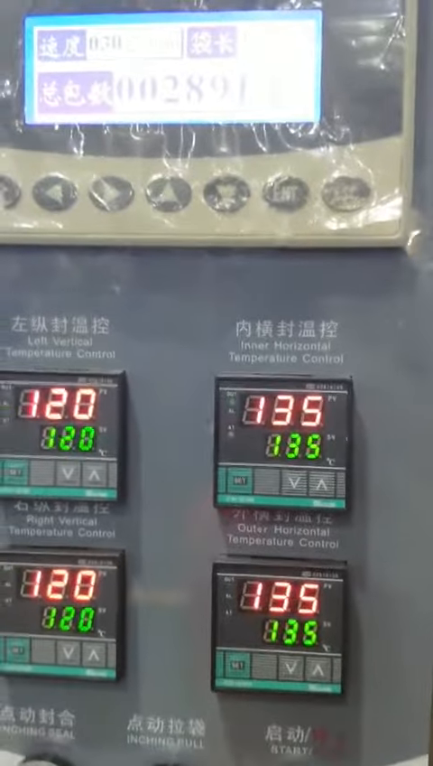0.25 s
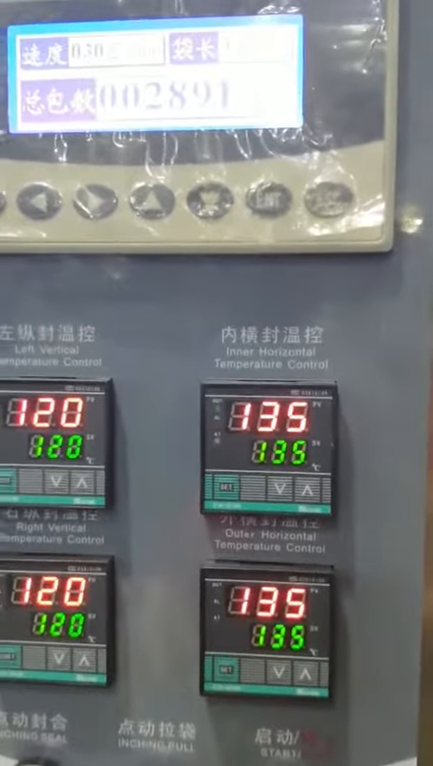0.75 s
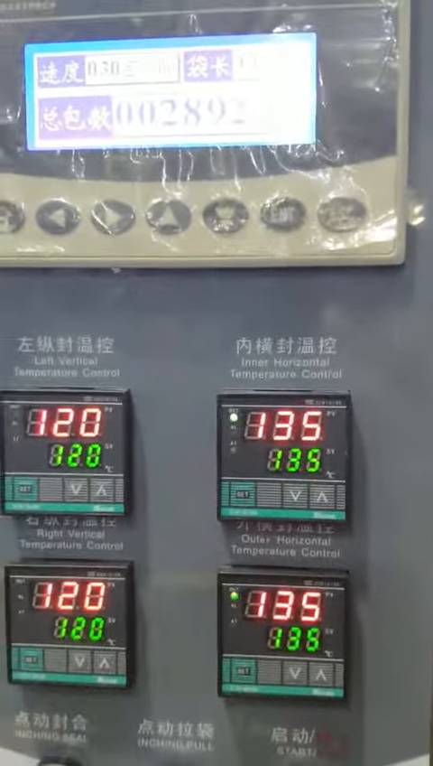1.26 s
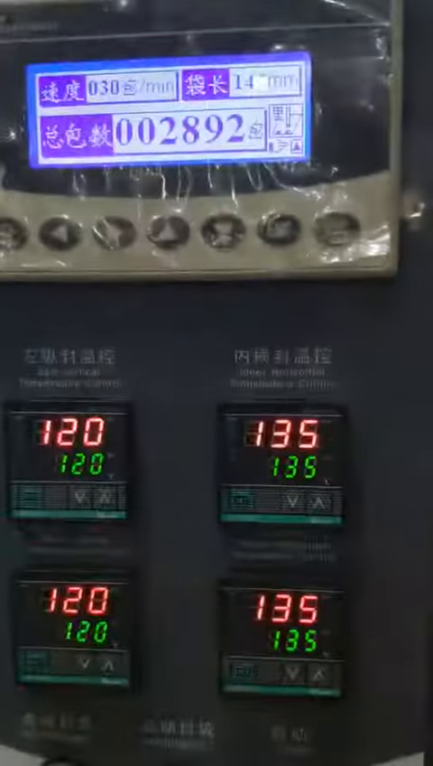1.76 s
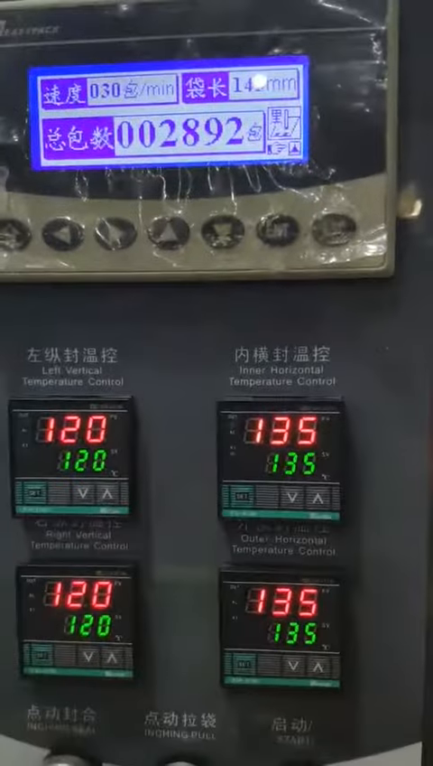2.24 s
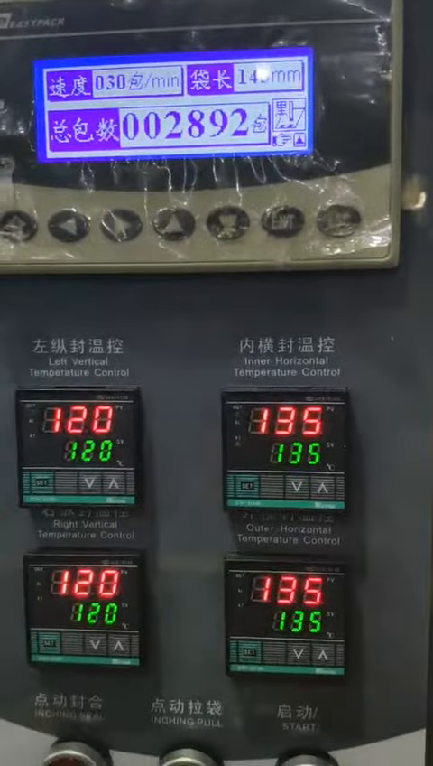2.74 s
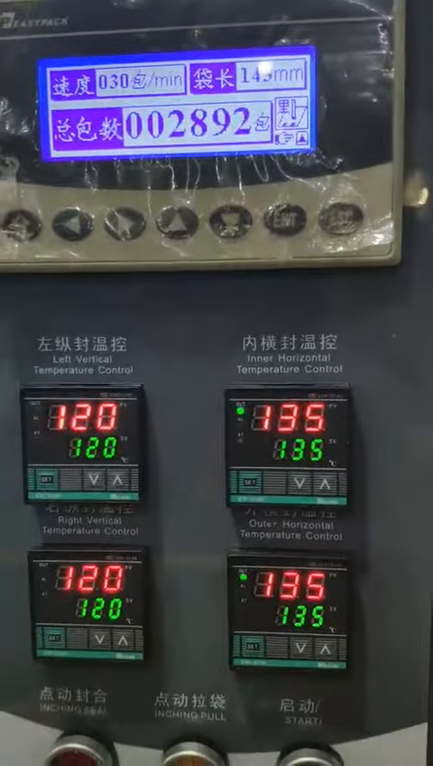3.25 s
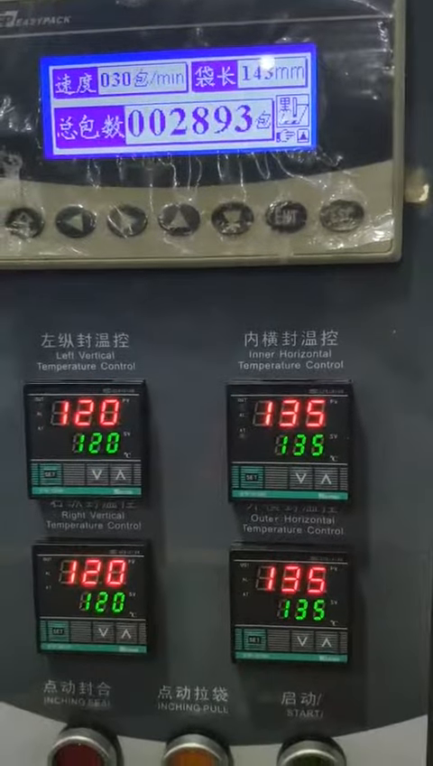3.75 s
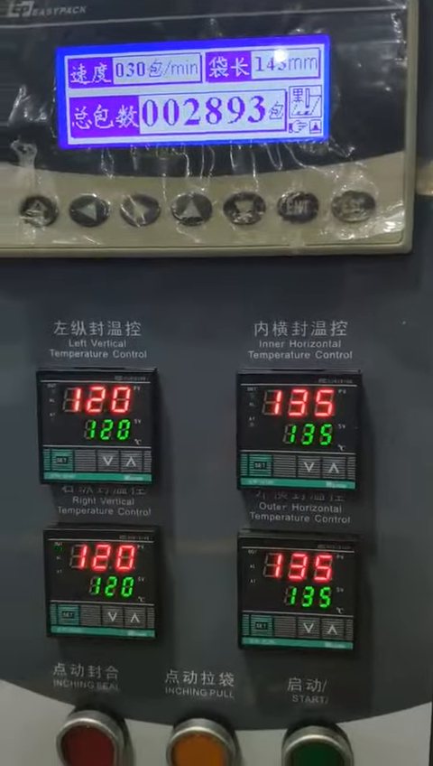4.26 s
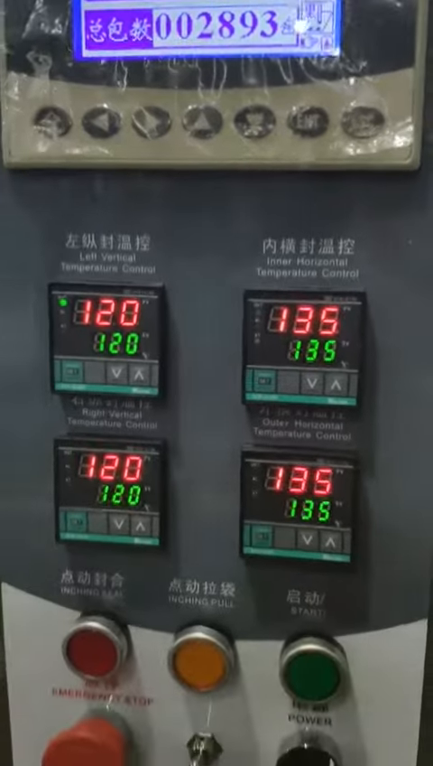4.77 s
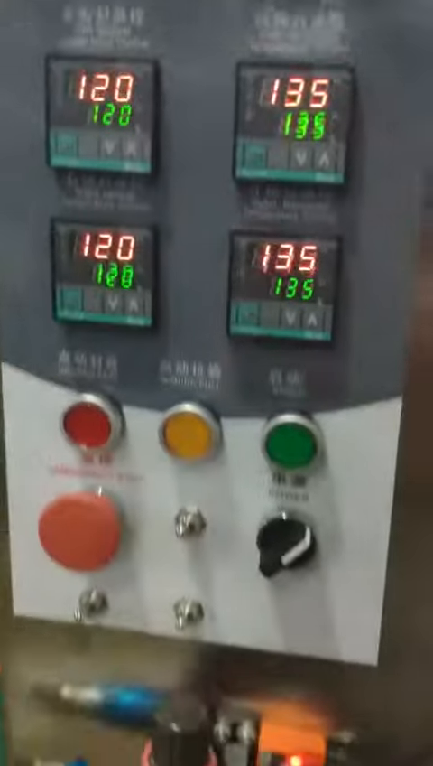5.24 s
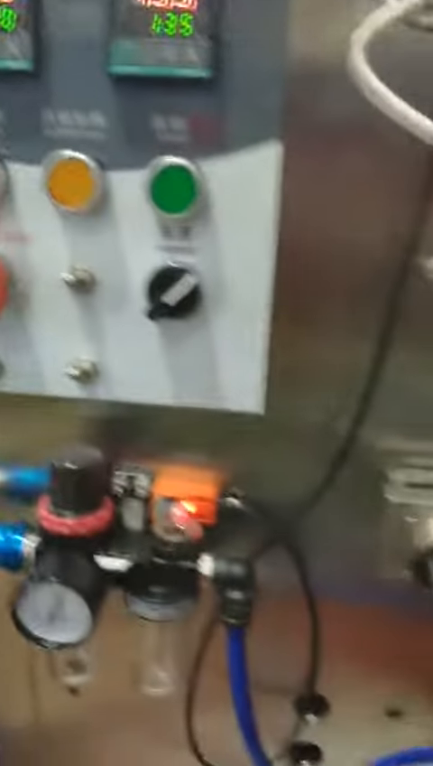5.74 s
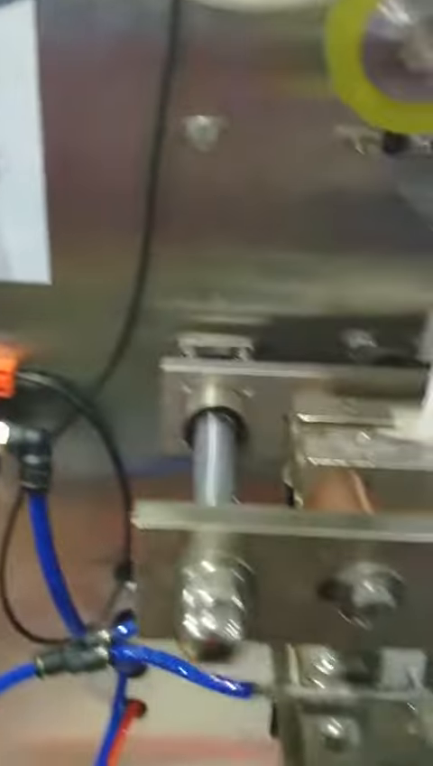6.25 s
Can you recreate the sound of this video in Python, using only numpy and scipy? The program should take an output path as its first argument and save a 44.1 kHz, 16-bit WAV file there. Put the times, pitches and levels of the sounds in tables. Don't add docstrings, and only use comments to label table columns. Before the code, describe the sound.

Rhythmic bursts of compressed air and steel knocks repeat about every two seconds over fan hum, ending with a faint shimmering metal ring.

```python
import sys
import numpy as np
from scipy import signal
from scipy.fft import rfft, irfft, next_fast_len
from scipy.io import wavfile
from scipy.ndimage import uniform_filter1d, map_coordinates

SR = 44100
rng = np.random.default_rng(int(sys.argv[2]) if len(sys.argv) > 2 else 0)


def waveform_to_disk(signal):
    frames = np.transpose(np.atleast_2d(signal))
    scaled = np.clip(frames, -1, 1) * 32767
    samples = np.round(scaled).astype(np.int16)
    wavfile.write(sys.argv[1], SR, samples)


def makeup_ratio(level_db):
    decades = np.asarray(level_db, float) / 20
    return 10 ** decades


N = 286635
TIME, SIZE = np.arange(N) / SR, next_fast_len(N + SR // 4, real=True)
HZ = np.maximum(np.fft.rfftfreq(SIZE, 1 / SR), 5)

# t/s, level/dB
WIND = [(0.0, -46), (1.27, -45), (1.32, -37), (2.06, -28), (2.19, -36), (2.43, -30), (2.48, -37),
        (2.7, -35), (2.77, -43), (3.17, -33), (3.48, -35), (3.67, -48), (3.71, -41), (5.21, -50),
        (6.3, -43), (6.5, -51)]
# f/Hz, level/dB
GUST = [(15, 2), (40, 3), (80, 0.5), (140, -15.5), (300, -53)]
# f/Hz, level per Hz/dB
HALL = [(30, -28), (80, -4), (130, 1), (200, -2), (500, -8), (1200, -10.5), (1750, -17), (2500, -18),
        (5000, -18.5), (8000, -17.5), (11000, -22.5), (16000, -23)]
# f/Hz, likeness/1
LIKENESS = [(60, 0.4), (250, .55), (600, 0.4), (1500, 0.033), (15000, .02)]
# t/s, jet low end/dB, 5 kHz ridge/dB, nearness/dB
TURN = [
    (0, 2, -30, -.6),
    (4.7, 2, -18, .1),
    (5.35, 0, -13, .8),
    (5.75, -2, -10, 1.2),
    (6.1, -4, -6.5, 1.0),
    (6.5, 1, -4, 1.5),
]

# t/s, peak level/dB
LATCH = [
    (0.2589, -3),
    (2.4607, -4.5),
    (4.6632, -4.5),
]
# t/s, peak level/dB
JAWS = [
    (0.7325, -8),
    (2.9345, -9),
    (5.1358, -9.5),
]
# t/s, peak level/dB
CUTTER = [
    (1.6001, 2.5),
    (3.7983, -0.5),
    (6.0233, -1),
]
# t/s, peak level/dB
STOP = [
    (1.6811, -12),
    (3.8841, -11),
    (6.0876, -14),
]
# t/s, peak level/dB, f/Hz
TICKS = [(0.033, -23, 5100), (0.059, -22, 3710), (1.921, -6, 4060), (2.0822, -21, 2670),
         (2.1176, -25, 3260), (2.1944, -23, 3280), (2.2218, -19, 4200), (2.2634, -20, 6960),
         (2.407, -14, 4090), (4.322, -17, 3730), (4.5121, -20, 4660)]
# t/s, length/s, level/dB
SQUEAKS = [(1.68, .03, -32), (1.725, 0.02, -27.5), (3.755, .01, -21), (3.864, 0.01, -28),
           (3.886, 0.015, -20), (3.91, 0.016, -19), (6.085, 0.049, -35)]

# f/Hz, level/dB, t60/s
FRAME = [(204.7, 5, 0.31), (302, -3, 0.1), (367, -6, 0.18), (405, -4, .18), (530, -2, 0.13),
         (665, -6, 0.17), (779, -3, 0.13), (859, -9, 0.13), (952, -12, 0.082), (1192, -16, 0.35),
         (1586, -20, .1)]
LATCH_BODY = [(300, -12, .04), (555, -8, .04), (1000, -10, .03), (1400, -14, .02), (1800, -13, 0.009),
              (2950, 3, .013), (3650, -4, 0.0072), (5070, -11, 0.004)]
JAW_BODY = [(205, -5, 0.14), (293, -5, .07), (355, -2, 0.1), (395, -2, 0.09), (525.6, -1, 0.09),
            (660, -3.5, 0.062), (793, -3, 0.046), (874, -7, 0.05), (966, -8, 0.028)]
CUTTER_BODY = [(600, -8, .03), (930, -3, 0.022), (1270, -6, .018), (2100, -14, .008), (3200, -2, .008),
               (4670, -0.5, .008), (6000, -2, 0.0076)]
STOP_BODY = [(4300, 0, .005), (5600, -2, .004), (7000, -4, .004)]
SLIDE_BODY = [(120, 0, .12), (185, 0, .12), (250, -3, .08), (420, -8, .05)]
# f/Hz, level per Hz/dB
SLIDE_NOISE = [(50, -14), (100, -0.5), (200, 0), (400, -8.5), (900, -15), (1500, -21), (2500, -29)]

RING_HZ = [2471, 3942, 4682, 7615, 8232, 12035, 12656]
# beat rate/Hz, level at 6.35 s/dB, slope/(dB/s), t of a beat minimum/s, left-right/dB
RING = [(9, -43, 20, 6.36, 1), (11.0, -44.5, 17, 6.39, 0.1), (15.5, -24, -45, 6.348, -0.5),
        (15, -31, 45, 6.41, -6), (15, -24.5, 20, 6.382, -4), (22.0, -32.5, 5, 6.435, 3),
        (14.0, -40, -5, 6.3, -9.5)]
# t/s, level/dB
RING_SWELL = [(6.13, -30), (6.17, -13), (6.22, -3), (6.35, -2.5), (6.5, -4.5)]

# f/Hz, level per Hz/dB
JET = [(1500, -47), (1900, -9), (2100, -9.5), (3200, -5), (4600, 1.5), (6500, 0), (9000, -1), (16000, -2)]
# f/Hz, width/Hz, level/dB
JET_PEAKS = [(3560, 230, 1.5), (4500, 320, 1), (5300, 300, 2), (6300, 200, 2)]
# delay/s, rise/s, level/dB, fall t60/s, top end/dB
PUFFS = [
    (-.246, .017, -30, .9, 2),
    (-.083, .016, -30, .6, -2),
    (0.0, .002, -27.5, .42, -4),
    (.421, .029, -26, .06, 1),
    (.4725, .0025, -23, .5, -1),
]
# held/s, fall t60/s
RETURN_END = [
    (.225, .2),
    (.24, .16),
    (.205, .12),
]

# f/Hz, level/dB
LEFT_PORT = [(30, -26), (110, -17.5), (250, -9.5), (600, 1), (1400, 2), (2500, 2.5), (5000, -3.5),
             (16000, -5.5)]
RIGHT_PORT = [(30, -1.5), (600, 0.5), (2500, 6.5), (5000, 6), (6500, 5), (7800, -2.5), (10000, -1),
              (16000, -3.5)]


def rms_one(x):
    return x / np.sqrt(np.mean(x ** 2) + 1e-20)


def in_time(rows):
    s, *columns = np.transpose(rows)
    return [np.interp(TIME, s, c) for c in columns]


def at_hz(points):
    hz, value = np.transpose(points)
    return np.interp(np.log(HZ), np.log(hz), value)


def colour(x, gain):
    return irfft(rfft(x, SIZE) * gain, SIZE)[..., :N]


def drift(rate):
    knots = rng.standard_normal(int(N / SR * rate) + 3)
    return map_coordinates(knots, [TIME * rate], order=2)


def stereo_noise(db):
    mid, side = rfft(rng.standard_normal((2, SIZE)))
    alike = np.clip(at_hz(LIKENESS), 0, 1)
    pair = np.sqrt(1 + alike) * mid + np.sqrt(1 - alike) * side * [[1], [-1]]
    return rms_one(irfft(pair * makeup_ratio(db), SIZE)[:, :N])


def ring(clicks, hz, t60):
    r, w = makeup_ratio(-60 / (t60 * SR)), 2 * np.pi * hz / SR
    return signal.lfilter([0, np.sin(w)], [1, -2 * r * np.cos(w), r * r], clicks + 1e-18)


def add(out, s, piece):
    i = int(s * SR)
    out[:, i:i + piece.shape[1]] += piece[:, :N - i]


def gate(start, rise, held, db, t60):
    t = TIME - start
    swell = np.clip(t / rise, 0, 1) ** 1.8
    return swell * makeup_ratio(db - 60 * np.maximum(t - rise - held, 0) / t60)


def after(events, delay, **swell):
    return sum(gate(row[0] + delay, **swell) for row in events)


def hall_noise():
    near_db = in_time(TURN)[2]
    return makeup_ratio(-35.1 + near_db + 1.1 * drift(2.77)) * stereo_noise(at_hz(HALL))


def wind():
    wind_db, = in_time(WIND)
    gusts = rng.standard_normal((2, N))
    buffeting = rms_one(colour(gusts + 0.53 * gusts[1], makeup_ratio(at_hz(GUST))))
    port_db = np.array([[10.5], [0]])
    return makeup_ratio(wind_db + 8 + 2.5 * drift(10) + port_db) * buffeting


def frame_shake():
    knocks = rng.standard_normal((2, N)) * makeup_ratio(1.54 * drift(60))
    knocks = knocks + 0.9 * knocks[0]
    modes = sum(makeup_ratio(db) * ring(knocks, hz, 0.25 * t60) for hz, db, t60 in FRAME)
    modes = rms_one(colour(modes, 1 / (1 + (170 / HZ) ** 6)))
    shake = after(LATCH, delay=.002, rise=.004, held=.03, db=-25, t60=.6)
    shake = shake + after(JAWS, delay=.001, rise=.0035, held=.028, db=-21.5, t60=.36)
    shake = shake + after(JAWS, delay=.02, rise=.03, held=.03, db=-30, t60=1.6)
    shake = shake + after(CUTTER, delay=.002, rise=.003, held=.008, db=-24, t60=.15)
    shake = shake + after(STOP, delay=.085, rise=.018, held=.02, db=-28, t60=.7)
    return modes * shake


def slide_rumble():
    slide = stereo_noise(at_hz(SLIDE_NOISE)) * makeup_ratio(1.2 * drift(50))
    return slide * after(CUTTER, delay=.039, rise=.002, held=.055, db=-18.5, t60=.7)


def air_drone():
    drone_hz, drone_t60_s = 130.9, 0.066
    air = rng.standard_normal((2, N))
    drone = ring(air + 1.9 * air[0], drone_hz, drone_t60_s)
    drone = rms_one(ring(drone, drone_hz, drone_t60_s))
    surge = after(LATCH + JAWS + CUTTER, delay=0.0, rise=.03, held=.03, db=-41, t60=.5)
    demand = makeup_ratio(-37 + 2.0 * drift(8)) + surge
    near_db = in_time(TURN)[2]
    return makeup_ratio(1.5 * near_db) * demand * drone


def squeaks():
    squeak_hz, width_hz = 8560, 70
    t60 = np.log(1000) / (np.pi * width_hz)
    tone = ring(rng.standard_normal((2, N)), squeak_hz, t60)
    tone = rms_one(ring(tone, squeak_hz, t60))
    jaw_squeaks = [(s + .002, .022, -28) for s, _ in JAWS]
    level = sum(makeup_ratio(db) * (TIME > s) * (TIME < s + length) for s, length, db in SQUEAKS + jaw_squeaks)
    return tone * uniform_filter1d(level, size=150)


def ringing_part():
    out, first = np.zeros((2, N)), int(RING_SWELL[0][0] * SR)
    t = TIME[first:]
    quarter_turn = np.pi / 2 * np.array([[0], [1]])
    for hz, (beats, db, db_per_s, quiet_s, pan_db) in zip(RING_HZ, RING):
        turn = np.pi * beats * (t - quiet_s)
        wobble = drift(35)
        phase = 2 * np.pi * hz * t + quarter_turn + .5 * wobble[first:]
        slope_db = db_per_s * np.clip(t - 6.35, -.05, 1)
        level = makeup_ratio(db + .9 * wobble[:len(t)] + slope_db + pan_db * np.array([[.5], [-.5]]))
        out[:, first:] += level * (np.sin(phase + turn) - 0.82 * np.sin(phase - turn))
    return out * makeup_ratio(in_time(RING_SWELL)[0])


def ticks():
    out, t = np.zeros((2, N)), TIME[:SR // 20]
    dull = signal.butter(1, 9000, fs=SR)
    jaw_ticks = [(s, -2, 5520) for s, _ in JAWS]
    for s, db, hz in TICKS + jaw_ticks:
        snap = np.diff(rng.standard_normal((2, len(t) + 1)))
        snap = signal.lfilter(*dull, snap) * makeup_ratio(-60 * t / 0.0058)
        add(out, s, makeup_ratio(db - 5.5) * (snap + makeup_ratio(-8) * ring(snap, hz, 0.0045)))
    return out


def blows(events, body, modes_db, crack_db, crack_t60, chatter_s):
    out, t = np.zeros((2, N)), TIME[:SR // 3]
    left_lag = 10
    bright = signal.butter(1, [1800, 9500], "band", fs=SR, output="sos")
    for s, db in events:
        rattle = rng.standard_normal((2, len(t))) * np.exp(-t / chatter_s)
        contact = 1.23 * rattle / np.sqrt(chatter_s * SR)
        contact[[0, 1], [left_lag, 0]] += 1
        modes = 0
        for k, (hz, level_db, t60) in enumerate(body):
            modes = modes + (-1) ** k * makeup_ratio(level_db) * ring(contact, hz, t60)
        crack = signal.sosfilt(bright, 1.6 * rng.standard_normal((2, len(t))))
        crack = crack * makeup_ratio(-60 * t / crack_t60)
        add(out, s, makeup_ratio(db) * (makeup_ratio(modes_db) * modes + makeup_ratio(crack_db) * crack))
    return out


def machine_blows():
    bounces = [(s + .0285, db - 7) for s, db in JAWS]
    jaw_stops = [(s - .0146, -5.5) for s, _ in JAWS]
    slide_starts = [(s + .041, -13) for s, _ in CUTTER]
    valve_thumps = [(s - .04, -22) for s, _ in JAWS]
    latch = blows(LATCH, LATCH_BODY, modes_db=-4, crack_db=-12, crack_t60=0.06, chatter_s=.007)
    jaws = blows(JAWS + bounces, JAW_BODY, modes_db=-3, crack_db=-28, crack_t60=.05, chatter_s=0.011)
    cutter = blows(CUTTER, CUTTER_BODY, modes_db=-12, crack_db=-8, crack_t60=0.035, chatter_s=0.005)
    stops = blows(STOP + jaw_stops, STOP_BODY, modes_db=-9, crack_db=-7, crack_t60=.009, chatter_s=.001)
    thuds = blows(slide_starts + valve_thumps, SLIDE_BODY,
                  modes_db=-3, crack_db=-30, crack_t60=.03, chatter_s=.008)
    return latch + jaws + cutter + stops + thuds


def cabinet_ripple(depth_db, step_hz):
    knots = rng.standard_normal((2, 400))
    return depth_db * np.array([np.interp(HZ / step_hz, np.arange(k.size), k) for k in knots])


def vents():
    rows = []
    for (latch, _), (cut, _), (held, fall) in zip(LATCH, CUTTER, RETURN_END):
        rows += [(latch + delay, rise, .01, db, t60, top_db) for delay, rise, db, t60, top_db in PUFFS]
        start, rise = latch + .639, .018
        rows.append((start, rise, cut + .003 - start - rise, -21, .075, .6))
        rows.append((cut + .022, .056, held, -21.5, fall, .6))
    return rows


def jets():
    peaks_db = sum(db / (1 + (2 * (HZ - hz) / width) ** 2) for hz, width, db in JET_PEAKS)
    noise = stereo_noise(at_hz(JET) + peaks_db + cabinet_ripple(depth_db=1.3, step_hz=110))
    upper, lower = 1 / (1 + (8800 / HZ) ** 8), 1 / (1 + (HZ / 3700) ** 6)
    low, body, top = colour(noise, lower), colour(noise, 1 - upper - lower), colour(noise, upper)
    ridge_hz, ridge_width_hz = 5000, 400
    ridge = colour(noise, 2 / (1 + (2 * (HZ - ridge_hz) / ridge_width_hz) ** 2))
    low_db, ridge_db, near_db = in_time(TURN)
    flow = top_flow = 0
    for *shape, top_db in vents():
        vent = gate(*shape)
        flow, top_flow = flow + vent, top_flow + makeup_ratio(top_db) * vent
    flutter = makeup_ratio(near_db + 0.72 * drift(30))
    body = body + makeup_ratio(low_db + 1.2 * drift(5)) * low
    body = body + makeup_ratio(ridge_db + 3.0 * drift(6)) * ridge
    return flutter * (flow * body + top_flow * top)


def reverb(x):
    t, hall_t60_s = TIME[:SR // 2], 0.66
    noise = rng.standard_normal((2, len(t)))
    dull = signal.lfilter([.3], [1, -.7], noise)
    tail = dull * makeup_ratio(-60 * t / hall_t60_s) + (noise - dull) * makeup_ratio(-60 * t / (0.44 * hall_t60_s))
    tail = tail * np.minimum(t / 0.0028, 1)
    return signal.fftconvolve(x, tail / np.sqrt(np.sum(tail ** 2) / 2), axes=1)[:, :N]


def scene():
    steady = hall_noise() + wind() + frame_shake() + slide_rumble() + air_drone() + squeaks() + jets()
    struck = ticks() + machine_blows()
    return struck + makeup_ratio(-11) * reverb(struck) + steady + ringing_part()


def gain_control(x):
    level_db = 10 * np.log10(uniform_filter1d(np.mean(x ** 2, axis=0), size=256) + 1e-12)
    recovery_db = 120 * TIME
    held_db = np.maximum.accumulate(level_db + recovery_db) - recovery_db
    excess_db = np.maximum(held_db + 23.5, 0)
    return x * makeup_ratio(-.18 * uniform_filter1d(excess_db, size=128))


def microphone_ports(x):
    peak_hz, width_hz, peak_db = 8085, 900, 18
    r, z = np.exp(-np.pi * width_hz / SR), np.exp(-2j * np.pi * HZ / SR)
    resonance = 1 - 2 * r * np.cos(2 * np.pi * peak_hz / SR) * z + r * r * z * z
    cavity = (1 - r * r) / 2 * (1 - z * z) / resonance
    left = makeup_ratio(at_hz(LEFT_PORT)) * (1 + makeup_ratio(peak_db) * cavity)
    right = makeup_ratio(at_hz(RIGHT_PORT))
    return colour(x, np.array([left, right]) * (HZ < 15900))


def band_limit(x):
    return signal.sosfilt(signal.butter(12, 16360, fs=SR, output="sos"), x)


def record(dry):
    mix = np.tanh(gain_control(microphone_ports(dry)))
    return band_limit(mix)


dry = scene()
out = record(dry)
waveform_to_disk(out)
```